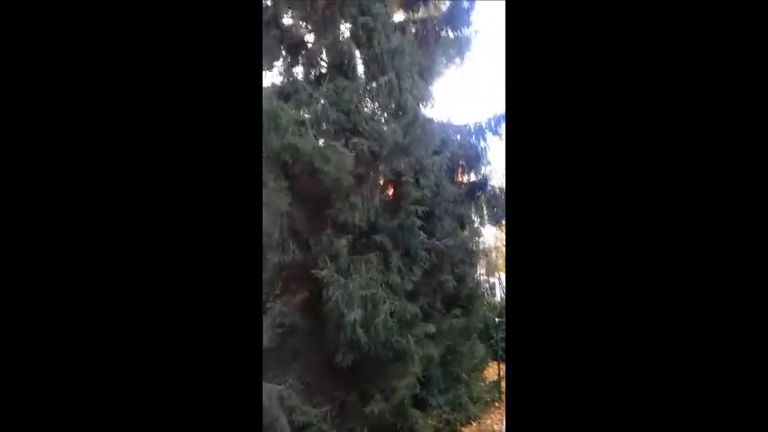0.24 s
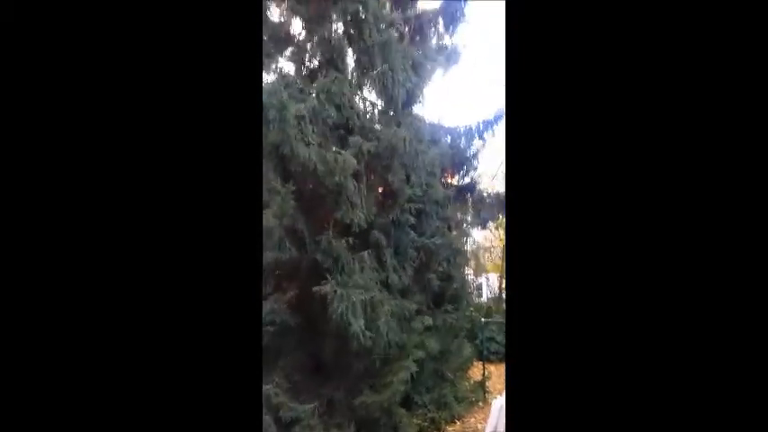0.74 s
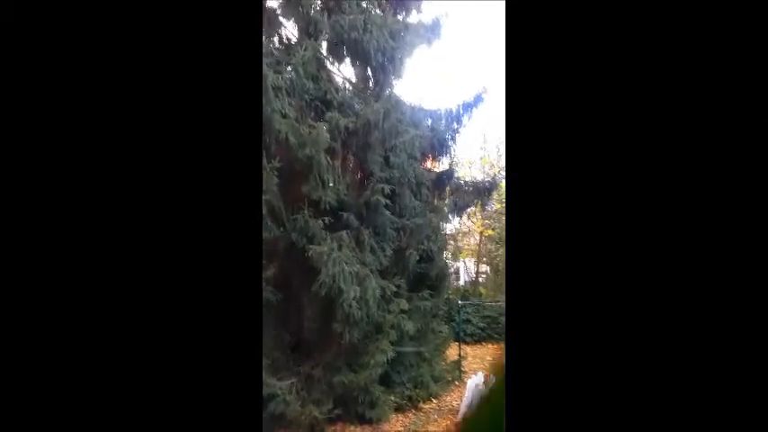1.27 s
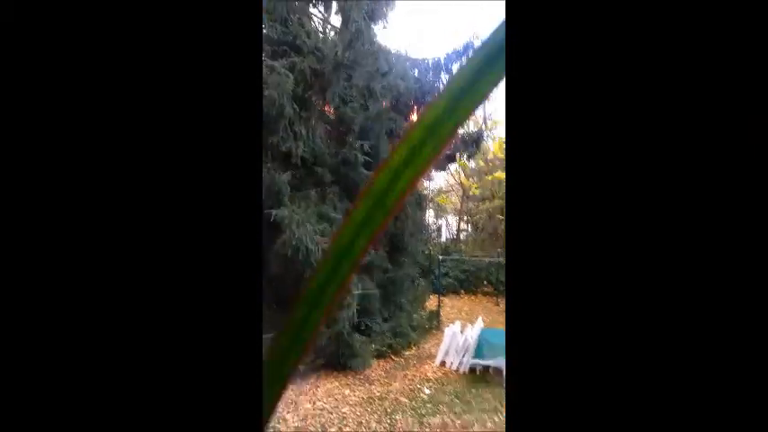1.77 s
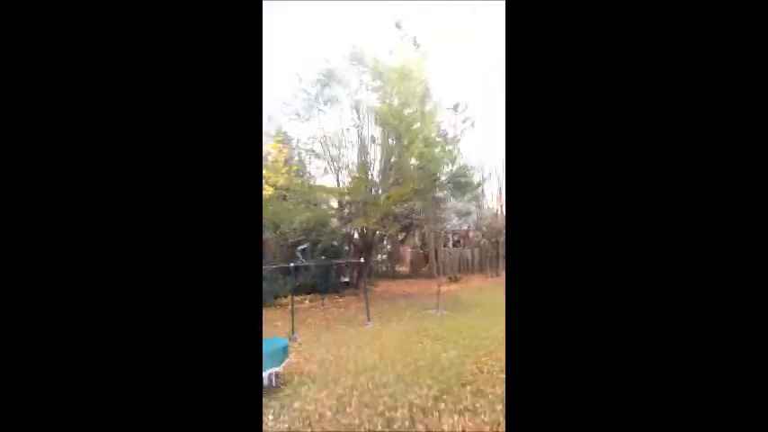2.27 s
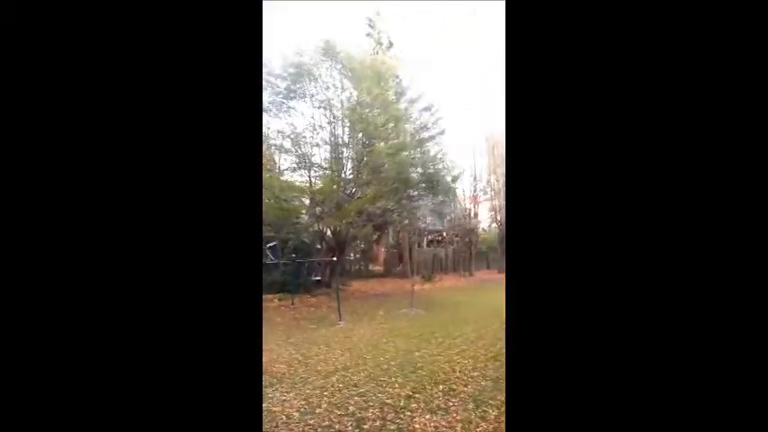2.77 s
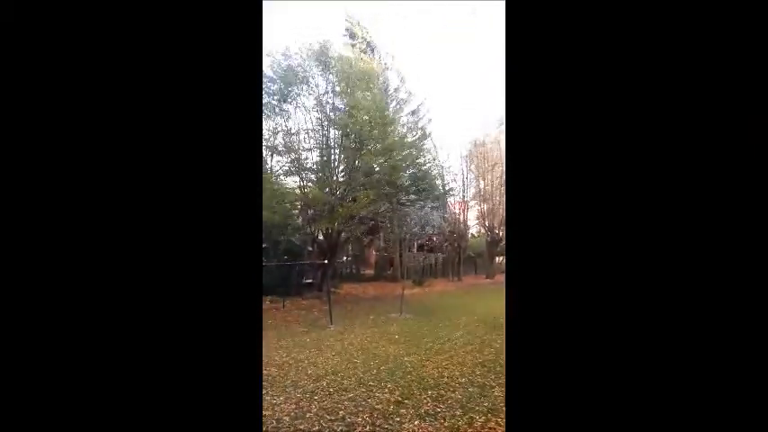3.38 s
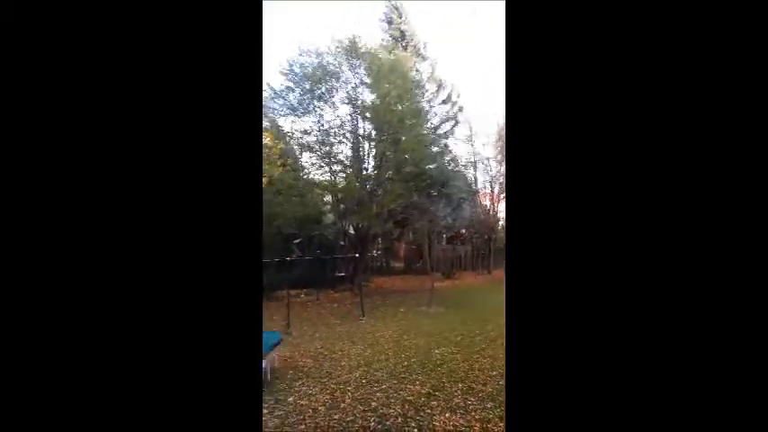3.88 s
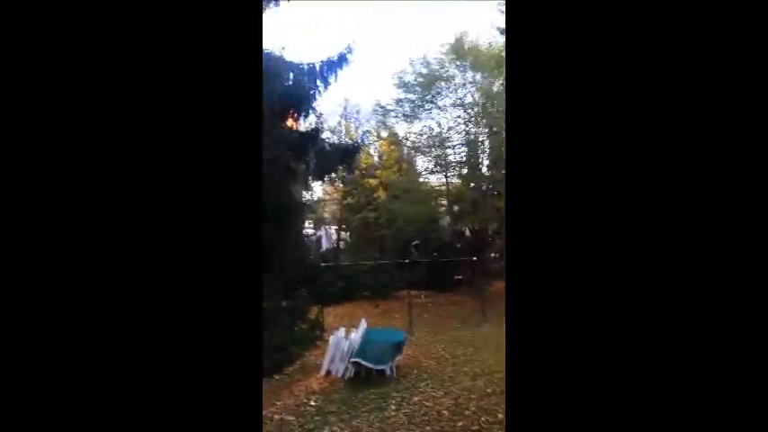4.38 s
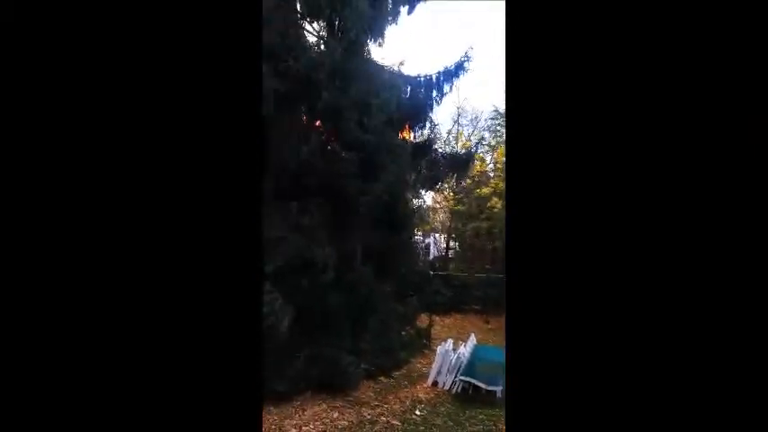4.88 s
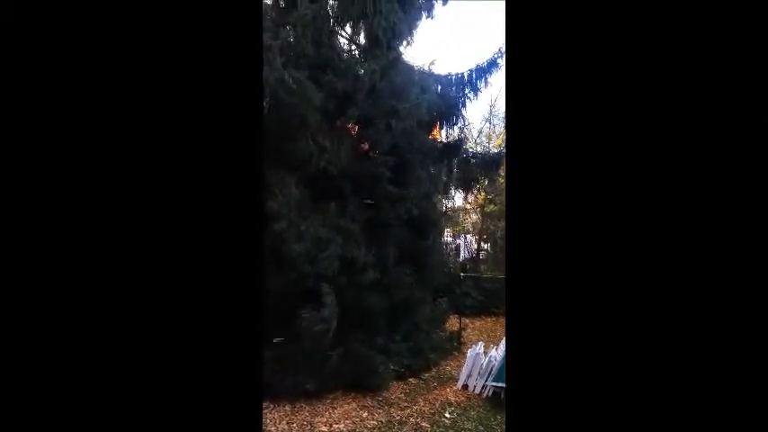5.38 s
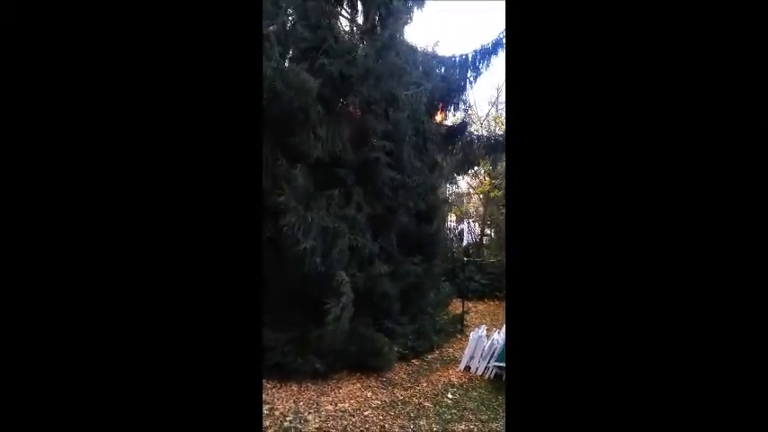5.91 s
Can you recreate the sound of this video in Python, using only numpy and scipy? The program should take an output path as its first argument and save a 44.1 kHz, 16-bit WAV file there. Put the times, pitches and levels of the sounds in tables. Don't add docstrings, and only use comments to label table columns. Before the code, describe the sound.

Outdoors in a garden, soft wind hisses through tall conifers. A long leaf close to the small stereo microphone ticks, slaps and scrapes, hardest near two seconds. Then an abrupt change to open ground: the trees rush much louder, and gusts strike one side at a time, thudding and crackling into distortion until the end.

```python
import sys
import numpy as np
from scipy import signal
from scipy.fft import rfft, irfft
from scipy.io import wavfile
from scipy.ndimage import uniform_filter1d

SR = 44100
rng = np.random.default_rng(int(sys.argv[2]) if len(sys.argv) > 2 else 0)


def amplitude_ratio(level_db):
    exponent = np.asarray(level_db, float) / 20
    return 10 ** exponent


def wav_record(signal):
    frames = np.transpose(np.atleast_2d(signal))
    bounded = np.clip(frames, -1, 1)
    quanta = np.round(bounded * 32767).astype(np.int16)
    wavfile.write(sys.argv[1], SR, quanta)


N = 271170
CUT_S = 2.3144

# time_s, level_db
SHELTER_WIND = [(0, -36.5), (.8, -37.5), (.95, -36), (1.25, -37.5), (1.42, -35), (1.65, -40), (2.0, -39.5),
                (2.12, -41.5), (2.31, -42.5)]
# time_s, level_db
OPEN_WIND = [(2.31, -25.5), (2.5, -25.5), (2.75, -22), (3.4, -22), (3.8, -21), (4.05, -24), (4.2, -21.5),
             (4.9, -20), (5.05, -22.5), (5.3, -16.5), (5.6, -24), (5.75, -19), (5.95, -19.5), (6.15, -16.5)]
# freq_hz, density_db_per_hz
SHELTER_COLOUR = [(140, -7), (220, 5), (380, -0.5), (620, 0.5), (1000, -10), (1400, -12.5), (2000, -14.5),
                  (3000, -17), (4500, -24), (7000, -32), (10500, -38.5), (14500, -43.5)]
OPEN_COLOUR = [(140, -0.5), (220, 5), (380, 4.5), (620, 1.5), (1000, -7), (1400, -13), (2000, -10),
               (3000, -12), (4500, -15), (7000, -21), (10500, -27.5), (14500, -33.5)]
# freq_hz, likeness_0_to_1
PORT_LIKENESS = [(60, 0.3), (200, 0.97), (500, 0.87), (800, 0.63), (1200, 0), (3000, 0)]
# freq_hz, gain_db
SHELTER_RECESS = [(100, -0.1), (300, -0.4), (600, 1.3), (1050, 5.1), (1550, 8.1), (2000, -0.8),
                  (2300, -3.8), (2750, 1.1), (3300, -1.6), (4200, -4.4), (5100, 2.3), (6000, -0.4),
                  (8000, -1.1), (12000, -3)]
OPEN_RECESS = [(100, -1.5), (300, -2.5), (600, 1), (1050, 4.5), (1350, 7), (1620, 11.5), (1950, -2.5),
               (2750, 4.5), (3300, -1.5), (4200, -7.5), (5100, 1), (6000, -3.5), (8000, -2.5), (12000, -6)]
# time_s, left_over_right_db
HEADING = [(0, 0.5), (2.3, 0.5), (2.7, 2), (4.2, 0.5), (4.6, 1), (6.15, -0.5)]
# freq_hz, t60_s
WALL_DECAY = [(300, 0.4), (1500, 0.66), (5000, 0.25), (12000, 0.26)]

# start_s, length_s, level_db
SCRAPES = [
    (1.382, 0.013, -27),
    (1.859, 0.032, -29),
    (1.98, 0.016, -24),
    (2.016, 0.022, -25.5),
    (2.07, 0.019, -41),
]
# freq_hz, level_db
SCRAPE_COLOUR = [(200, -29), (450, 11.5), (1000, -0.5), (1800, -1), (2800, -8.5), (5000, -4), (10000, -32)]
# time_s, crack_db, thud_over_crack_db, left_over_right_db, thud_hz
SLAPS = [(0.916, -40.5, 17.5, 2, 1490), (1.272, -15.5, 4, 2.5, 2450), (1.3635, -13.5, -0.5, -1.5, 1660),
         (1.381, -27, 11, -2, 2880), (1.7328, -52, 21, -9, 2190), (1.8142, -28, 9.5, -2, 1350),
         (1.851, 1, -23, 0.5, 2230), (1.8741, -44, 18, -0.5, 1630), (1.934, -37, 8, -4, 1000),
         (1.9581, -0.8, -19.5, 0.5, 1900), (1.9835, -29, 6.5, 2, 957), (1.9942, -19, -13, -6, 1310),
         (2.0086, -31.5, 7.5, -3, 1800), (2.0184, -31.5, 14.5, 7, 1700), (2.0326, -28, 9.5, -3, 1200),
         (2.0722, -34, 2, -7, 990)]
# time_s, crack_db, thud_over_crack_db, left_over_right_db, thud_hz
TICKS = [
    (0.9101, -20, 7.5, 1.5, 1190),
    (1.494, -29, -31, -15, 2000),
    (1.532, -29, -27, -6, 2000),
    (1.846, -7, -13, 7, 2000),
    (1.9545, -15, -16, 5, 2000),
    (2.9777, -9.5, -21, 9.5, 2000),
    (5.4311, -12, 11, 10.5, 1980),
    (6.026, -18, 8, -21, 1520),
]
# freq_hz, level_db
CRACK_COLOUR = [(800, -5.5), (2000, -10.5), (4000, -3.5), (6000, 6), (9000, -0.5), (13000, 1.5), (16000, 1)]
# multiple_of_thud_hz, level_db
THUD_COLOUR = [(.12, -5), (.3, -5.5), (.7, -7.5), (1.0, -4.5), (1.4, 1.5), (2.5, -13.5), (5, -38)]

# time_s, level_db, length_s
LEFT_EDDIES = [(2.349, -11, 0.031), (2.938, -19, 0.013), (3.468, -14.5, .008), (3.48, 1.5, 0.014),
               (3.5, -1.5, 0.016), (3.521, -8, 0.013), (3.54, -5, 0.012), (3.568, -4.5, 0.02),
               (3.586, -3.5, 0.022), (3.602, -3, 0.0049), (3.617, -3, 0.02), (3.634, -6, 0.01),
               (3.682, -5.5, 0.01), (3.775, -10.5, 0.0093), (3.815, -10.5, 0.0096), (4.4, -20, 0.03),
               (4.555, -12, 0.047), (4.595, -2.5, 0.011), (4.859, -14.5, 0.017), (4.889, -3, 0.0021),
               (5.386, -7, 0.0084), (5.434, 0.5, 0.0053), (5.471, -6.5, 0.0052), (5.483, -42, 0.0043),
               (5.56, -6, 0.0063)]
RIGHT_EDDIES = [(2.871, -16.5, 0.023), (3.089, -7, 0.019), (3.128, -11.5, 0.019), (3.143, -10.5, .012),
                (4.379, -0.5, 0.0057), (4.398, -14, 0.044), (4.5, -13, 0.059), (4.685, -5.5, 0.0078),
                (4.701, -7.5, 0.019), (4.738, -10.5, 0.043), (4.805, -15.5, 0.019), (5.147, -11, 0.018),
                (5.17, -11, .014), (5.227, 5, 0.016), (5.246, 1.5, 0.0066), (5.259, -3, 0.015),
                (5.291, -3, 0.014), (5.307, -3, 0.021), (5.39, -7.5, 0.02), (5.426, -6.5, 0.023),
                (5.486, -1.5, 0.019), (5.718, -5, 0.013), (5.745, -12, 0.059), (5.785, -8, 0.025),
                (5.815, -9, 0.032), (5.99, -5, 0.015), (6.012, -5.5, 0.022), (6.03, 5.5, 0.0086),
                (6.101, -9, 0.046), (6.119, -4.5, 0.004)]
# freq_hz, level_db
FRONT_COLOUR = [(300, 6), (700, 8.5), (1500, 2), (3000, -28.5), (6000, -25.5), (14000, -42.5)]

# freq_hz, density_db_per_hz
SELF_NOISE = [(25, -8), (120, -16), (2000, -30), (8000, -35), (14000, -29)]
# freq_hz, threshold_over_8_khz_mean_db
TREBLE_FLOOR = [(7000, -20), (9500, -7), (11000, -3), (12500, -2.5), (14400, -2), (14800, 20)]


def evened(x):
    return x / np.sqrt(np.mean(abs(x) ** 2) + 1e-20)


def smoothed(x, size, again, axis=0):
    return evened(uniform_filter1d(uniform_filter1d(x, size=size, axis=0), size=again, axis=axis))


def read(points, hz):
    f, value = np.transpose(points)
    return np.interp(np.log(hz + 1), np.log(f + 1), value)


def coloured(x, points):
    hz = np.fft.rfftfreq(x.shape[-1], 1 / SR)
    return irfft(rfft(x) * amplitude_ratio(read(points, hz)), x.shape[-1])


def low_cut(x, hz):
    return signal.sosfilt(signal.butter(2, hz, "high", fs=SR, output="sos"), x)


def add(mix, s, sound):
    part = mix[..., round(s * SR):][..., :sound.shape[-1]]
    part += sound[..., :part.shape[-1]]


def trees(wind, colour, recess, roar_db, follow, patchy_db, gusty_db):
    frames, hz = N // 256 + 5, np.fft.rfftfreq(1024, 1 / SR)
    t = np.arange(frames) * 256 / SR
    s, wind_db = np.transpose(wind)
    hiss_db = np.interp(t, s, wind_db)
    pan_db = np.interp(t, *np.transpose(HEADING))
    roar_db = roar_db + follow * (hiss_db - np.mean(wind_db))

    shape = amplitude_ratio(read(colour, hz))
    hiss_db = hiss_db - 10 * np.log10(np.sum(shape[(hz > 2000) & (hz < 8000)] ** 2))
    roar_db = roar_db - 10 * np.log10(np.sum(shape[(hz > 150) & (hz < 1000)] ** 2))
    upper = np.clip(np.log2((hz + 1) / 800) / 0.86, 0, 1)[:, None]

    a, b, c, d, patches = rng.standard_normal((frames, 513, 5)).T
    patches = smoothed(patches, 14, 12, axis=1)
    gusts = smoothed(rng.standard_normal(frames), 7, 7)
    field_db = upper * hiss_db + (1 - upper) * roar_db + patchy_db * patches + gusty_db * gusts

    same = np.clip(read(PORT_LIKENESS, hz), 0, 1)[:, None]
    right = a + 1j * b
    left = same * right + np.sqrt(1 - same ** 2) * (c + 1j * d)
    left = left * amplitude_ratio(read(recess, hz)[:, None] + upper * pan_db / 2)
    right = right * amplitude_ratio(-upper * pan_db / 2)
    z = np.array([left, right]) * shape[:, None] * amplitude_ratio(field_db)
    rush = signal.istft(z, nperseg=1024, noverlap=768)[1][:, :N]
    return low_cut(rush, 130)


def walls(x):
    taps = np.zeros((2, SR // 2))
    at = np.arange(100, SR // 2 - 20, 20) + rng.integers(0, 20, (2, (SR // 2 - 101) // 20))
    np.put_along_axis(taps, at, rng.choice([-1., 1.], at.shape), 1)
    hz, t, z = signal.stft(taps, SR, nperseg=256)
    fading = z * amplitude_ratio(-60 * t / read(WALL_DECAY, hz)[:, None])
    tail = signal.istft(fading, SR, nperseg=256)[1]
    return signal.fftconvolve(x, tail / np.linalg.norm(tail[0]), axes=1)[:, :N]


def scrape():
    bite_db_per_s, let_go_db_per_s, grains_per_s = 1300, 900, 2600
    t = np.arange(N) / SR
    sizes = amplitude_ratio(4 * np.minimum(rng.exponential(1, (2, N)), 4))
    grains = sizes * (rng.random((2, N)) < grains_per_s / SR) * rng.choice([-1, 1], (2, N))
    drags = np.zeros(N)
    for s, length, db in SCRAPES:
        bite_db = bite_db_per_s * np.maximum(s - t, 0)
        let_go_db = let_go_db_per_s * np.maximum(t - s - length, 0)
        drags += amplitude_ratio(db - bite_db - let_go_db)
    return evened(coloured(grains, SCRAPE_COLOUR)) * drags


def leaf():
    slap_t60_s, tick_t60_s = 0.038, 0.0092
    ring_db, ring_t60_s = 1.5, 0.04
    out, t = np.zeros((2, N)), np.arange(8192) / SR
    hits = [(*h, slap_t60_s) for h in SLAPS] + [(*h, tick_t60_s) for h in TICKS]
    for s, db, thud_db, pan_db, thud_hz, t60 in hits:
        noise = rng.standard_normal((3, 8192))
        crackle = noise[:2] * amplitude_ratio(1.8 * evened(uniform_filter1d(noise[2], size=24)))
        thud = coloured(crackle, np.multiply(THUD_COLOUR, [thud_hz, 1]))
        dulling = 0.023 * (thud_db + 33) / 1000
        crack = coloured(crackle, [(f, level - dulling * f) for f, level in CRACK_COLOUR])
        ring = np.cos(2 * np.pi * thud_hz * t + noise[0, 0]) * amplitude_ratio(ring_db - 60 * t / ring_t60_s)
        burst = evened(crack) + amplitude_ratio(thud_db + 8.5) * (evened(thud) + ring)

        rise = 0.0012 + 0.13 * t60 * min(amplitude_ratio(db), 1)
        attack = np.sin(np.pi / 2 * np.minimum(t / rise, 1)) ** 2
        envelope = attack * amplitude_ratio(-60 * np.maximum(t - rise, 0) / t60)
        energy = np.sum((burst * envelope) ** 2, 1, keepdims=True)
        burst = burst * envelope * np.sqrt(np.sum(envelope ** 2) / energy)
        strength = amplitude_ratio(db - 6) * np.hypot(1, amplitude_ratio(thud_db + 5.5))
        pan = amplitude_ratio(np.array([[pan_db], [-pan_db]]) / 2)
        add(out, s - 0.36 * rise, strength * pan * burst)
    return out


def flutters():
    count, level_db, length_s = 14, -19, 0.029
    first_s = CUT_S + 0.1
    when, strength, size = rng.random((3, count))
    times = first_s + when * (N / SR - first_s)
    return list(zip(times, level_db + 6 * (strength - 0.5), length_s * (0.5 + size)))


def eddies(rows):
    middling_hz, middling_s, smaller_higher = 314, 0.011, 0.1
    width_octaves, overdrive = 0.84, 0.16
    out, t, hz = np.zeros(N), np.arange(-2048, 2048) / SR, np.fft.rfftfreq(4096, 1 / SR)
    for s, db, length in list(rows) + flutters():
        noise = rng.standard_normal(4096)
        centre_hz = 0.93 * middling_hz * (length / middling_s) ** -smaller_higher
        octaves = np.log2((hz + 1) / centre_hz)
        skirts_db = np.where(octaves > 0, -7 - 11 * octaves, -8 + 3.1 * octaves)
        spectrum = np.exp(-0.5 * (octaves / width_octaves) ** 2) + amplitude_ratio(skirts_db)
        swing = signal.hilbert(irfft(rfft(noise) * spectrum))
        swing = (swing / (abs(swing) + 1e-9) ** 0.1).real
        passing = np.exp(-abs(1.45 * t / length) ** 2.5)
        swing = swing / np.sqrt(np.sum((swing * passing) ** 2) / np.sum(passing ** 2))

        db = db + 0.34 + overdrive * max(db + 7.5, 0)
        edge = np.exp(-((t + 0.2 * length) / 0.0025) ** 2)
        front = evened(coloured(noise[::-1], FRONT_COLOUR)) * edge
        add(out, s + t[0], amplitude_ratio(db) * (swing * passing + amplitude_ratio(-3 + 0.48 * db) * front))
    return out


def ducked(x):
    from_db, share, fall_s, back_db_per_s = -12, 0.75, 0.05, 56
    past = np.exp(-1 / (fall_s * SR))
    power = signal.lfilter([1 - past], [1, -past], np.minimum(x ** 2, 1).max(0))
    back = np.arange(N) * back_db_per_s / SR
    held_db = np.maximum.accumulate(10 * np.log10(power + 1e-12) + back) - back
    return x * amplitude_ratio(-share * np.maximum(held_db - from_db, 0))


def thinned(x):
    frame = dict(window="cosine", nperseg=2048, noverlap=1024)
    hz, _, z = signal.stft(x, SR, **frame)
    near_8k = np.sqrt(np.mean(abs(z[:, (hz > 7000) & (hz < 9000)]) ** 2, axis=(0, 1)))
    wobble_db = 0.8 * rng.standard_normal(len(near_8k))
    need = near_8k * amplitude_ratio(read(TREBLE_FLOOR, hz)[:, None] + wobble_db)
    need = need * (near_8k < 1.9 * np.roll(near_8k, 2))
    rounded = (abs(z) > need) * np.maximum(1, 1.5 * need / (abs(z) + 1e-12))
    gain = np.where((hz < 6000)[:, None], 1, rounded) * (hz < 14900)[:, None]
    return signal.istft(z * gain, SR, **frame)[1][:, :N]


def scene():
    sheltered = np.arange(N) < CUT_S * SR
    near = trees(SHELTER_WIND, SHELTER_COLOUR, SHELTER_RECESS,
                 roar_db=-35, follow=2.42, patchy_db=-0.28, gusty_db=1.18)
    far = trees(OPEN_WIND, OPEN_COLOUR, OPEN_RECESS,
                roar_db=-21, follow=0.59, patchy_db=0.88, gusty_db=0.93)
    slaps = low_cut(leaf() + scrape(), 120)
    slaps = slaps + amplitude_ratio(-12) * walls(slaps) * sheltered
    slaps = np.array([coloured(slaps[0], SHELTER_RECESS), slaps[1]])
    buffeting = np.array([eddies(LEFT_EDDIES), eddies(RIGHT_EDDIES)])
    return np.where(sheltered, near, far) + slaps + buffeting


def band_limit(x):
    return signal.sosfilt(signal.butter(12, 15490, fs=SR, output="sos"), x)


def record(dry):
    mix = ducked(low_cut(dry, 70))
    mix = mix + amplitude_ratio(-56) * evened(coloured(rng.standard_normal((2, N)), SELF_NOISE))
    mix = np.clip(thinned(np.clip(mix, -1, 1)), -1, 1)
    return band_limit(mix)


dry = scene()
out = record(dry)
wav_record(out)
```